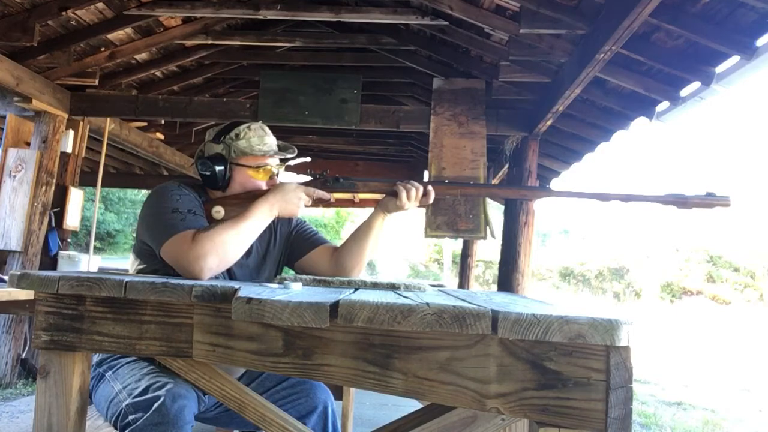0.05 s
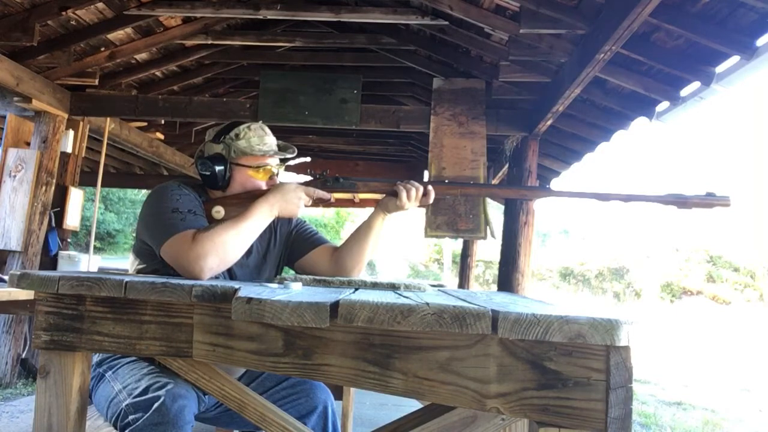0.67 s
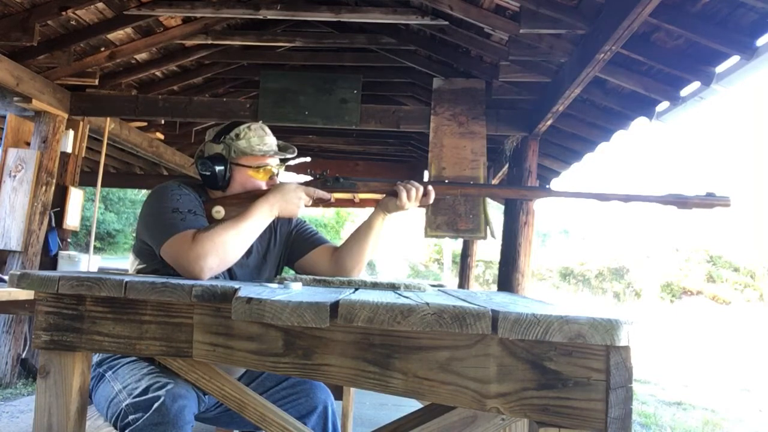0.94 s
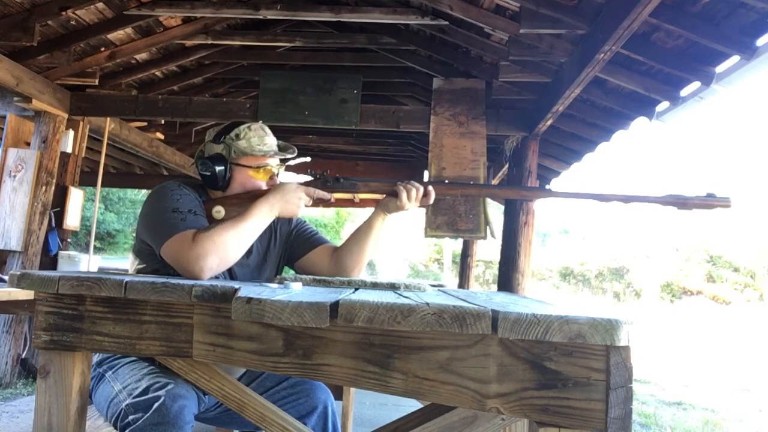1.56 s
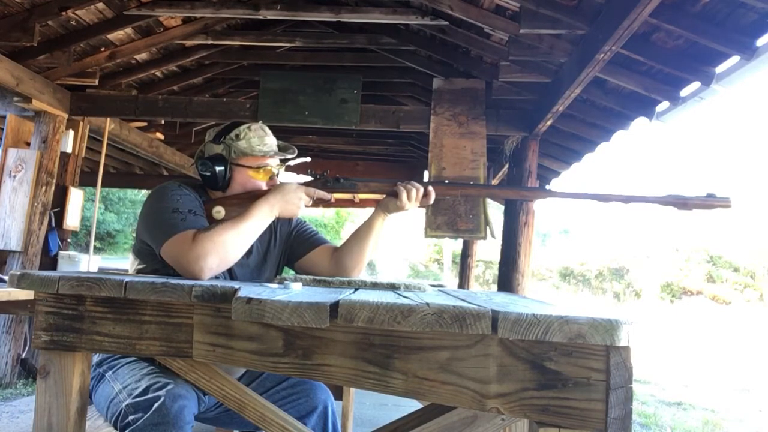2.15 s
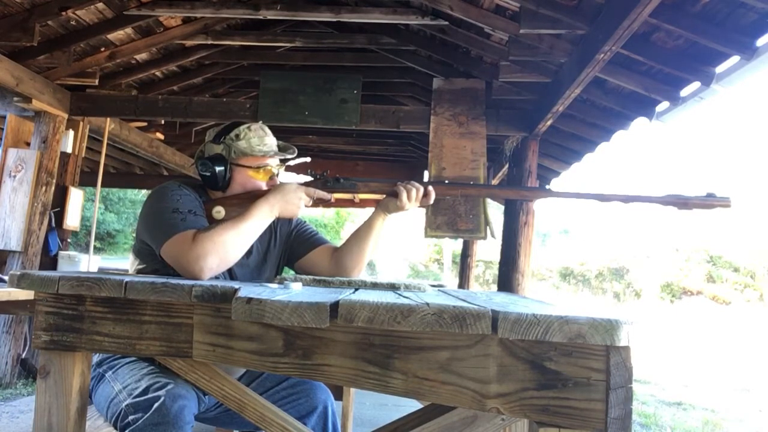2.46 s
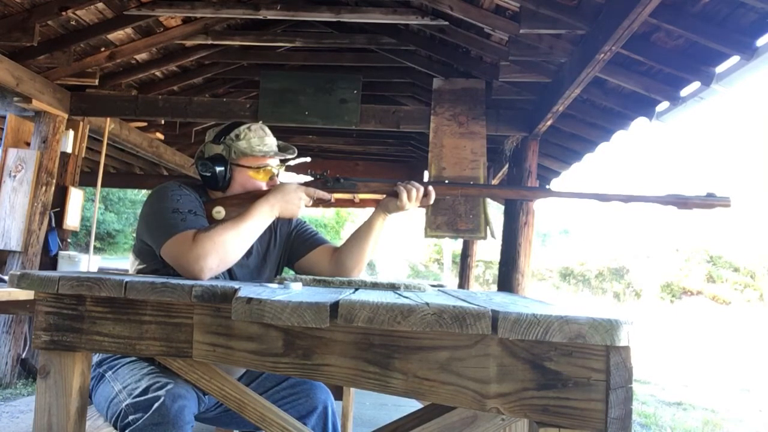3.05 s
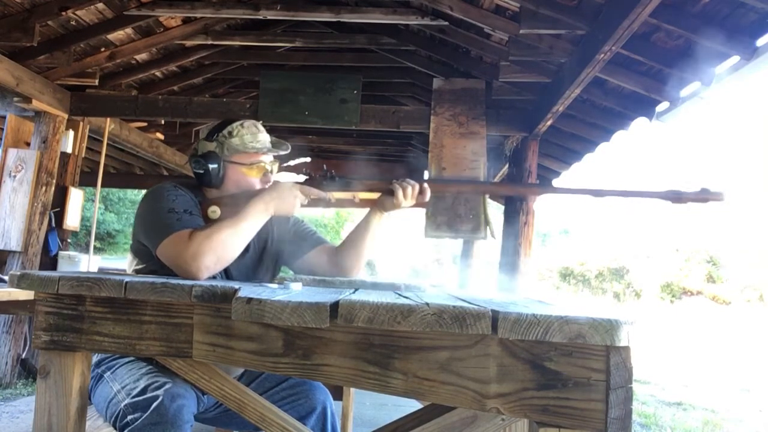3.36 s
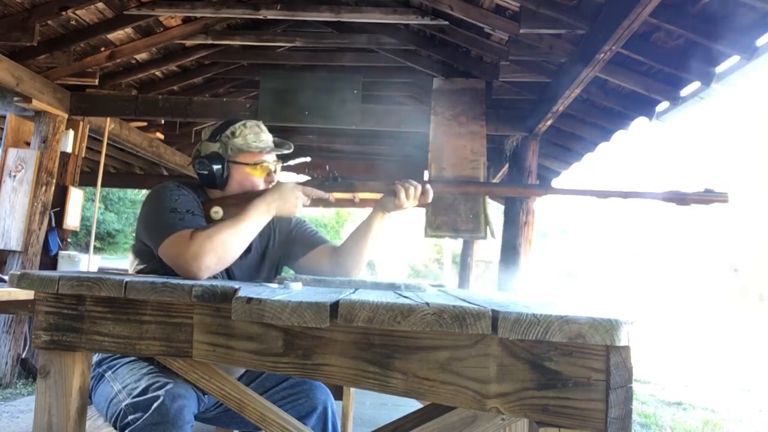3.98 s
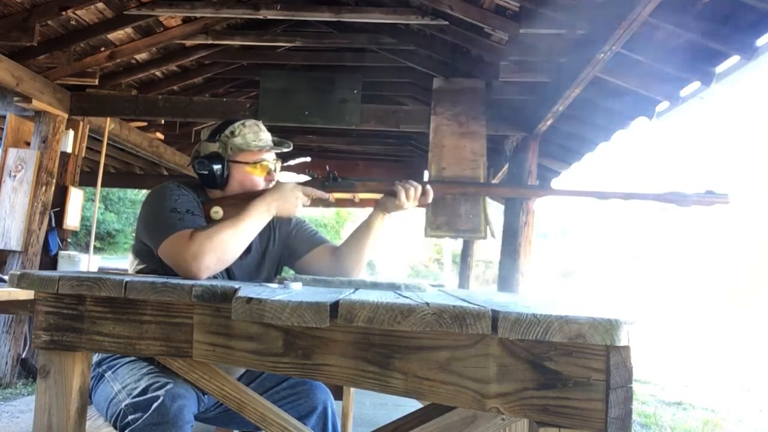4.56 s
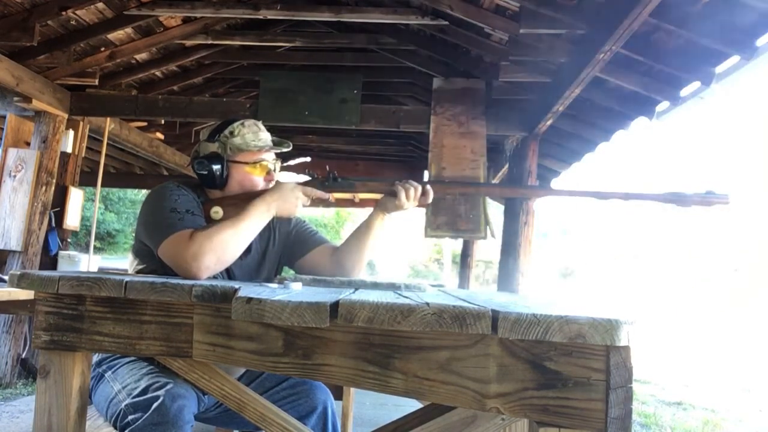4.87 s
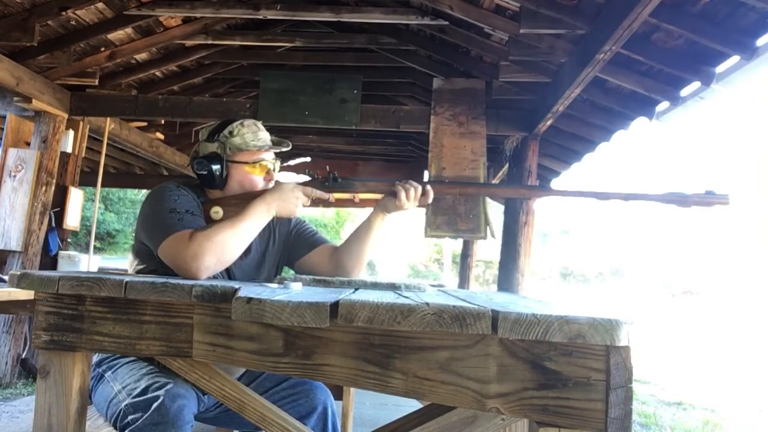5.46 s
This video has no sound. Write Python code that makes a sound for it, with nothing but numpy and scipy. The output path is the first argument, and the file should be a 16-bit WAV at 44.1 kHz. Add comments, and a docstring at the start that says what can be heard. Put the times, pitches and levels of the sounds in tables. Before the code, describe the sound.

A distant gunshot cracks, then a very loud close rifle shot booms and echoes across an outdoor shooting range.

```python
"""First comes the low rumble of an outdoor shooting range, with faint insects and a distant engine.
A neighbour's gun cracks. Then a muzzleloading rifle fires close by, from a bench under a timber roof.
Each shot rattles round the shelter and rolls back from banks and woods, duller the further it has gone.
The phone turns itself down under the blast and creeps back up; a bird chirps twice near the end."""
import sys
import numpy as np
from scipy import signal
from scipy.fft import rfft, irfft, next_fast_len
from scipy.io import wavfile

SR = 44100
rng = np.random.default_rng(int(sys.argv[2]) if len(sys.argv) > 2 else 0)


def wrap_up_sound(samples):
    """Save the sound to the file named by the first command line argument, as 16-bit audio."""
    columns = np.atleast_2d(samples).T
    # keep every value between -1 and 1, then stretch to whole-number steps
    tamed = np.clip(columns, -1, 1)
    steps = np.round(tamed * 32767).astype(np.int16)
    wavfile.write(sys.argv[1], SR, steps)


N = 243431
TIME = np.arange(N) / SR
TICKS = TIME[::16]  # a coarser clock for loudness curves
BANDS_HZ = 25 * 2 ** (np.arange(29) / 3)  # three bands to an octave

# The rifle goes off in three steps (cap, ignition, muzzle blast): start_s, level_db, rise_s
FIRING = [(3.1528, -22, 0.00062), (3.157, -17.5, .007), (3.169, -3.5, 0.0041)]


def undb(db):
    """Turn decibels into a number to multiply a sound by."""
    return 10 ** (np.asarray(db) / 20)


def wander(rate_hz, times=TICKS):
    """A random curve, mostly between -1 and 1, that turns rate_hz times a second."""
    return 1.2 * np.interp(times * rate_hz, np.arange(4096), rng.standard_normal(4096))


def swell(age_s, rise_s, fade_s):
    """Loudness that builds up over rise_s, then falls by 60 dB every fade_s."""
    return np.clip(age_s / rise_s, 0, 1) * undb(-60 * np.maximum(age_s - rise_s, 0) / fade_s)


def split_bands(sound):
    """Cut a sound into overlapping bands, low to high, all equally strong."""
    size = next_fast_len(N)
    spectrum = rfft(sound, size)
    hz = np.arange(len(spectrum)) * SR / size
    place = np.interp(np.log(hz + 1), np.log(BANDS_HZ), np.arange(len(BANDS_HZ)))
    bands = [irfft(spectrum * np.maximum(1 - abs(place - k), 0), size)[:N] for k in range(len(BANDS_HZ))]
    return [band / band.std() * np.sqrt(2 / 3) for band in bands]


def band_shares(colour, tilt_db=0, bass_db=0, treble_hz=1100, bass_hz=385):
    """Each band's share of the power; tilt_db is added per octave of treble, bass_db to the bass."""
    hz, db = np.transpose(colour)
    band_db = np.interp(np.log(BANDS_HZ), np.log(hz), db)
    band_db += tilt_db * np.maximum(np.log2(BANDS_HZ / treble_hz), 0)
    band_db += bass_db / (1 + (BANDS_HZ / bass_hz) ** 2)
    power = BANDS_HZ * undb(band_db) ** 2  # higher bands are wider
    return power / power.sum()


def burst(start_s, level_db, rise_s, fade_s, tilt_db, bass_db):
    """The settings for one swarm of tiny echoes."""
    return start_s, level_db, rise_s, fade_s, tilt_db, bass_db


def reflections(bursts, colour, grain_db, flutter_db, patchy_db):
    """Swarms of tiny echoes blur into noise; the longer they travel, the more treble the air takes."""
    power = sum(np.outer(band_shares(colour, tilt, bass), (undb(db) * swell(TICKS - s, rise, fade)) ** 2)
                for s, db, rise, fade, tilt, bass in bursts)
    travel_s = np.maximum(TICKS - bursts[0][0], 0)
    # a few surfaces throw back much more than the rest
    swarm = rng.standard_normal(N) * undb(grain_db * wander(650, TIME))
    flutter = flutter_db * wander(60)
    out = np.zeros(N)
    for hz, band, band_power in zip(BANDS_HZ, split_bands(swarm), power):
        air_loss_db = 0.1634 * travel_s * (hz / 1000) ** 2.3
        patches = patchy_db * wander(40)  # echoes that meet boost some pitches and cancel others
        out += band * np.interp(TIME, TICKS, np.sqrt(band_power) * undb(flutter + patches - air_loss_db))
    return out


def landscape(echoes, fired_s, fade_per_rise, tilt_db, delay_dulling, rise_dulling, woods_db, hill_db):
    """Echo bursts: deep woods answer slowly, fade slowly and sound dull; far ones are duller still."""
    bursts = []
    for start_s, level_db, rise_s in echoes:
        delay_s = start_s - fired_s
        echo_tilt_db = tilt_db - delay_dulling * delay_s - rise_dulling * rise_s
        bass_db = hill_db if delay_s > 1 else woods_db  # the distant hillside keeps more bass
        bursts.append(burst(start_s, level_db, rise_s, fade_per_rise * rise_s, echo_tilt_db, bass_db))
    return bursts


def open_air(level_db=-56.5):
    """Steady outdoor rumble with a faint hiss."""
    # Tone of the open air: pitch_hz, relative_db
    colour = [(20, -19), (55, 4), (110, -3.5), (200, -10.5), (350, -19), (700, -20.5), (900, -17.5),
              (1400, -25), (2100, -34.5), (3800, -38.5), (5200, -36.5), (8000, -37.5), (10500, -44),
              (16000, -42.5)]
    bands = split_bands(rng.standard_normal(N))
    return undb(level_db) * sum(band * np.sqrt(share) for band, share in zip(bands, band_shares(colour)))


def insects():
    """Many insects blend into narrow bands of high hiss."""
    # Insect choruses: pitch_hz, width_hz, level_db
    choruses = [(4480, 300, -80), (4670, 90, -82.5), (7850, 130, -90.5)]
    out = np.zeros(N)
    for hz, width, db in choruses:
        band = signal.butter(2, [hz - width / 2, hz + width / 2], "band", fs=SR, output="sos")
        buzz = signal.sosfilt(band, rng.standard_normal(N))
        out += buzz / buzz.std() * undb(db)
    return out


def engine(waver_db=1.04, ease_s=0.3, ease_db=5, darken_db=5.5, sag_hz=1):
    """A far engine hums on four harmonics (multiples of one pitch), then eases off, duller and lower."""
    # The engine's first three harmonics: time_s, second_pitch_hz, first_db, second_db, third_db
    drone = [(0.0, 176.1, -68, -64, -79), (0.29, 177.3, -64, -54, -84), (0.61, 177.2, -54, -55, -65),
             (0.93, 177.4, -54.5, -60, -66), (1.21, 177.0, -61, -67, -61.5),
             (1.72, 176.8, -65.5, -55.5, -69), (1.97, 177.5, -60.5, -49.5, -66.5),
             (2.62, 177.9, -53.5, -49, -65), (3.05, 177.2, -48, -44, -58)]
    times, *columns = np.transpose(drone)
    second_hz, *levels_db = (np.interp(TIME, times, column) for column in columns)
    levels_db.append(levels_db[1] - 22)  # the fourth follows the second, more quietly
    eased = np.clip((TIME - times[-1]) / ease_s, 0, 1)
    phase = 2 * np.pi * np.cumsum(second_hz / 2 - sag_hz * eased) / SR
    out = np.zeros(N)
    for k, db in enumerate(levels_db):
        drop_db = (ease_db + k * darken_db) * eased
        out += np.sqrt(2) * undb(db - drop_db + waver_db * wander(5, TIME)) * np.sin((k + 1) * phase)
    return out


def bird():
    """Thin upward chirps, smeared by the trees."""
    # Chirps: start_s, level_db, start_hz, end_hz, length_s
    chirps = [(5.329, -71, 5380, 7300, 0.062), (5.505, -71, 5560, 7620, .068)]
    out = np.zeros(N + SR)
    for start_s, db, start_hz, end_hz, length_s in chirps:
        left = np.linspace(1, 0, int(length_s * SR))  # share of the chirp still to come
        phase = 2 * np.pi * np.cumsum(end_hz + (start_hz - end_hz) * left ** 2) / SR
        start = int(start_s * SR)
        out[start:start + len(left)] += undb(db) * np.sqrt(2 * left) * np.sin(phase)
    trees = rng.standard_normal(SR // 4) * swell(TIME[:SR // 4], rise_s=0.001, fade_s=0.17)
    return signal.fftconvolve(out[:N], trees / np.linalg.norm(trees))[:N]


def along_benches(sound):
    """Travelling along the row of benches makes some pitches louder and others softer."""
    # Peaks and dips of the row: pitch_hz, width_hz, lift_db
    peaks = [(420, 100, 1), (562, 80, 5), (1190, 190, 2), (2615, 610, -1.5), (3270, 560, 3.5)]
    size = next_fast_len(N)
    hz = np.arange(size // 2 + 1) * SR / size
    lift_db = sum(db * np.exp(-(2 * (hz - centre) / width) ** 2) for centre, width, db in peaks)
    return irfft(rfft(sound, size) * undb(lift_db), size)[:N]


def neighbour_shot(fired_s=0.846):
    """The neighbour's bang rattles under the roof and comes back off boards and the landscape."""
    # Tone of this gun: pitch_hz, relative_db
    colour = [(30, -26), (90, -2.5), (200, -8.5), (370, -13.5), (800, -2), (1750, 1.5), (3200, -6),
              (4400, -10), (6400, -11), (9500, -16.5), (11500, -20.5), (15000, -28)]
    # Slaps off flat boards: start_s, level_db
    slaps = [(0.925, -38), (1.014, -36), (1.0516, -34), (1.098, -46)]
    # Echoes from near and far: start_s, level_db, rise_s
    echoes = [(.917, -34.5, .015), (1.04, -50, 0.064), (1.343, -55, 0.068), (1.859, -43.5, 0.0053),
              (1.87, -52.5, 0.061), (2.05, -51, 0.043), (2.275, -50, .06), (2.335, -52.5, 0.16)]
    bang = burst(fired_s, -32, rise_s=0.0033, fade_s=0.21, tilt_db=-1.8, bass_db=16)
    rattle = burst(0.862, -39, rise_s=0.0034, fade_s=1.68, tilt_db=0.5, bass_db=1)
    swish = burst(1.635, -49, rise_s=0.057, fade_s=0.46, tilt_db=0.5, bass_db=-29)  # a soft, hissy echo
    bursts = [bang, rattle, swish]
    bursts += [burst(*row, rise_s=0.0013, fade_s=0.033, tilt_db=-6.5, bass_db=-24) for row in slaps]
    bursts += landscape(echoes, fired_s, fade_per_rise=36, tilt_db=0.7,
                        delay_dulling=0.96, rise_dulling=66.5, woods_db=-14, hill_db=-5)
    return reflections(bursts, colour, grain_db=0.55, flutter_db=0.7, patchy_db=1.5)


def rifle_roll():
    """The shelter booms, then the shot rolls back from the backstop behind the targets and the woods."""
    # Tone of the rolling echo: pitch_hz, relative_db
    colour = [(25, -49), (60, -15), (110, -2.5), (200, 1.5), (400, -6.5), (850, 5), (1500, 0), (3200, -8),
              (6400, -17.5), (9500, -18.5), (15000, -22.5)]
    # Echoes off banks and woods: start_s, level_db, rise_s
    echoes = [(3.39, -27, 0.02), (3.529, -24, 0.016), (3.555, -25.5, 0.04), (3.737, -36, .11),
              (4.03, -40.5, 0.12), (4.212, -36, .052), (4.355, -33, 0.032), (4.45, -40, .15),
              (4.815, -44.5, 0.027)]
    boom = burst(3.172, -25, rise_s=0.02, fade_s=0.61, tilt_db=-9.5, bass_db=29)
    backstop = burst(3.352, -21.5, rise_s=0.0035, fade_s=1, tilt_db=4, bass_db=9)
    woods = landscape(echoes, fired_s=FIRING[0][0], fade_per_rise=40.4, tilt_db=7,
                      delay_dulling=3, rise_dulling=85, woods_db=-7.5, hill_db=9.5)
    return reflections([boom, backstop] + woods, colour, grain_db=0.5, flutter_db=1.0, patchy_db=1.5)


def ringing_parts(waver=0.063):
    """The blast sets the rifle's steel lock, the bench and the roof ringing at unsteady pitches."""
    # Ringing parts: start_s, pitch_hz, level_db, rise_s, fade_s
    rings = [(3.160, 6970, -10, 0.027, .05), (3.163, 1074, -6.5, 0.0012, 0.013),
             (3.169, 1286, 1, 0.0063, .033), (3.170, 1887, -3, .004, 0.031), (3.186, 285, -2.5, .012, .12),
             (3.190, 434.3, -5, 0.016, 0.22), (3.200, 223.2, 2.5, 0.021, .22), (3.207, 867, -2, .012, .16),
             (3.215, 67.7, -12.5, .02, 0.28)]
    out = np.zeros(N)
    age_s = TIME[:SR // 2]
    for start_s, hz, db, rise_s, fade_s in rings:
        drift = waver / (1 + hz / 3000) * wander(200, age_s)  # timber wavers more than stiff steel
        phase = 2 * np.pi * np.cumsum(hz * (1 + drift)) / SR
        start = int(start_s * SR)
        out[start:start + len(age_s)] += undb(db) * swell(age_s, rise_s, fade_s) * np.sin(phase)
    return out


def shock_waves():
    """Sharp cracks: the air pressure jumps up, slides down through zero and jumps back."""
    # The neighbour's gun, the blast off bench and roof, the target slap: start_s, peak_db, length_ms
    cracks = [(0.8457, -27, 0.68), (0.8603, -22.5, 0.9), (3.1731, 3.5, 0.8), (3.1767, 13, 0.7),
              (3.1785, 7, 0.22), (3.3540, -3.5, 0.38)]
    out = np.zeros(N)
    for start_s, peak_db, length_ms in cracks:
        pressure = np.linspace(1, -1, int(length_ms * SR / 1000))
        start = int(start_s * SR)
        out[start:start + len(pressure)] += undb(peak_db) * pressure
    return signal.sosfilt(signal.butter(1, 9000, fs=SR, output="sos"), out)


def rifle_blast():
    """The rifle fires; its blast bounces off the rafters and slaps back off the target boards."""
    # Tone of the blast in the shelter: pitch_hz, relative_db
    colour = [(20, -26), (55, -3.5), (110, -9), (200, 7.5), (330, 1), (600, -4), (1200, -3.5), (2000, -9.5),
              (4200, -18), (7000, -14), (11000, -19), (16000, -21)]
    # Bounces off roof and rafters: start_s, level_db
    rafters = [(3.177, 3), (3.197, 1.5), (3.218, 3)]
    firing = [burst(*row, fade_s=0.17, tilt_db=-1.5, bass_db=-2.5) for row in FIRING]
    roof = [burst(*row, rise_s=0.008, fade_s=0.18, tilt_db=0.98, bass_db=-3.1) for row in rafters]
    target = burst(3.3526, -2.5, rise_s=0.00018, fade_s=0.012, tilt_db=3.5, bass_db=-10)
    return reflections(firing + roof + [target], colour, grain_db=0.7, flutter_db=0.04, patchy_db=1.0)


def scene():
    """Both shots and their echoes over the quiet range."""
    rifle = rifle_blast() + ringing_parts() + rifle_roll()
    down_the_row = along_benches(neighbour_shot() + open_air() + insects())
    return (engine() + bird() + down_the_row + shock_waves() + rifle)[None]


def gain_control(sound, limit_db=-11, react_s=0.017, held_share=0.89, recover_db_per_s=7):
    """Sound over the limit is turned down; most of the cut lingers and slowly wears off."""
    smoothing = np.exp(-1 / (react_s * SR))
    power = signal.lfilter([1 - smoothing], [1, -smoothing], sound ** 2)
    over_db = np.maximum(10 * np.log10(power + 1e-12) - limit_db, 0)
    recovery_db = recover_db_per_s * TIME
    held_db = np.maximum.accumulate(held_share * over_db + recovery_db, axis=-1) - recovery_db
    return sound * undb(-np.maximum(over_db, held_db))


def record(dry, ceiling=0.92, top_hz=15800):
    """The phone turns the blast down, rounds its peaks and cuts the highest treble."""
    rounded = ceiling * np.tanh(gain_control(dry) / ceiling)
    return signal.sosfilt(signal.ellip(10, 0.2, 80, top_hz, fs=SR, output="sos"), rounded)


dry = scene()
out = record(dry)
wrap_up_sound(out)
```